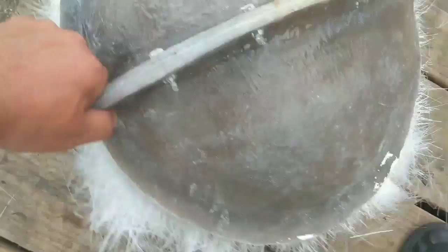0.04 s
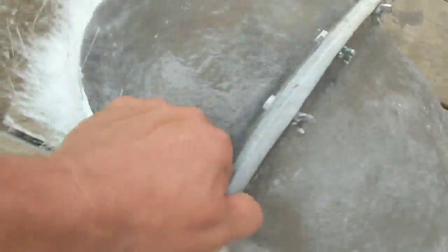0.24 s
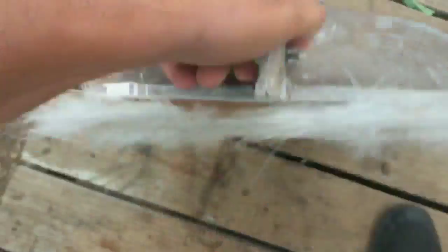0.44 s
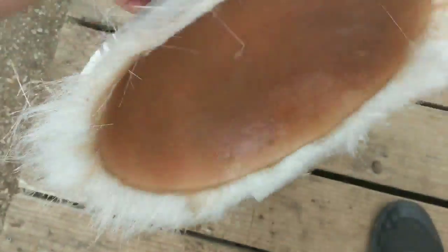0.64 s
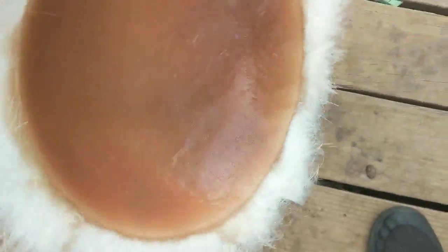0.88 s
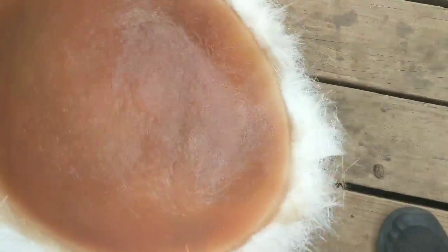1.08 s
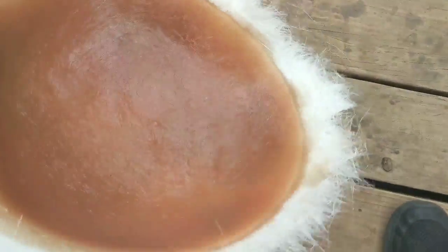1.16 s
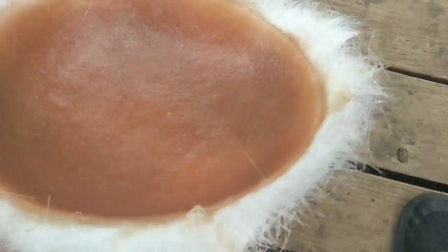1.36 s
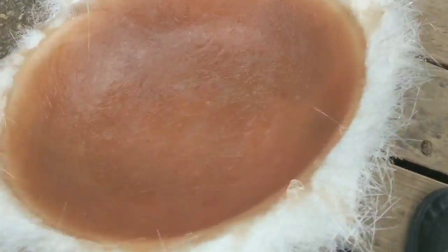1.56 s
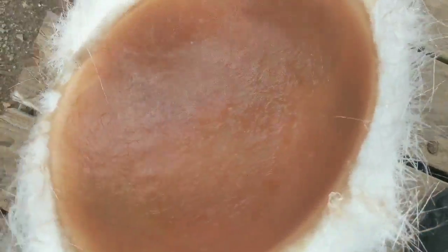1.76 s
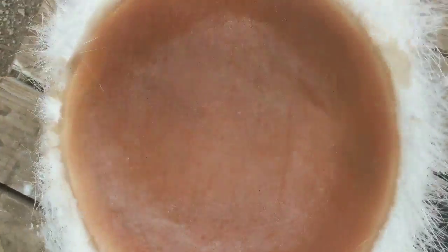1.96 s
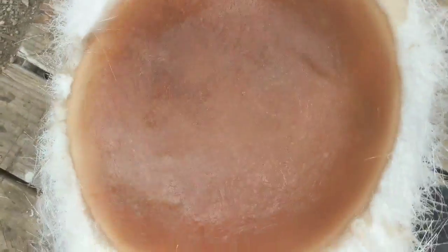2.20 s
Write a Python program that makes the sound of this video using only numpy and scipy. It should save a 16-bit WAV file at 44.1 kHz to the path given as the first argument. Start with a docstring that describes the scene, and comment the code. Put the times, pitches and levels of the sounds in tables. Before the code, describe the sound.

A stiff fibreglass shell bumps and scrapes on a wooden deck, close and dry. Soft thuds and a rough drag quicken to a loud, bright clack at 0.37 s. Two hollow knocks come at 0.67 and 0.73, then dull, quieter bumps over low handling rumble. A crisp snap at 1.46, a bristly scratch at 1.82, then hard short-ringing knocks at 1.95, 2.02 and 2.17.

```python
"""Soft bumps, bristly scraping and hard knocks, interleaved over a low rumble: a stiff fibreglass shell is
dragged, turned over and set down on a wooden deck, close to a small microphone.
Knocks, bumps and dragging slips ring a bank of decaying shell modes. Noise bursts make the rim's ticks,
random grains its scrape; shaped noise gives the handling rumble and the quiet floor."""
import sys
import numpy as np
from scipy import signal
from scipy.fft import rfft, irfft
from scipy.io import wavfile

SR = 44100
rng = np.random.default_rng(int(sys.argv[2]) if len(sys.argv) > 2 else 0)


def transcribe(signal):
    """Save signal, clipped to [-1, 1], as a 16-bit WAV file at the path in sys.argv[1]."""
    frames = np.atleast_2d(signal).T
    limited = np.clip(frames, -1, 1)
    pcm = np.round(limited * 32767).astype(np.int16)
    wavfile.write(sys.argv[1], SR, pcm)


def field_ratio(decibels):
    """Amplitude ratio for a level in dB (20 dB per decade); scalars and array-likes work."""
    return 10 ** (np.asarray(decibels, dtype=float) / 20)


N = 98431

# resonant modes of the shell: pitch_hz [Hz], level_db [dB, relative], t60_s [s, before ring_scale]
SHELL_MODES = [(88, -2, 0.22), (151.7, -13.5, 0.64), (207, 4.5, 0.15), (250, -4, 0.2), (336.1, -4, 0.32),
               (396.3, 2, 0.12), (459, -0.5, 0.13), (538, 0.5, 0.069), (670, -5.5, 0.1), (798, -4.5, 0.069),
               (1125, 0.5, 0.027), (1360, -7.5, 0.048), (1723, -2, 0.021)]


def in_time(rows, outside_db=-120):
    """A level curve (s, dB) as gain, practically silent outside its span."""
    s, db = np.transpose(rows)
    return field_ratio(np.interp(np.arange(N) / SR, s, db, left=outside_db, right=outside_db))


def rms_one(x):
    """Scale to unit rms."""
    return x / np.sqrt(np.mean(x ** 2) + 1e-20)


def colour(x, points):
    """Shape a spectrum by a (Hz, dB) table, then scale to unit rms."""
    hz, db = np.transpose(points)
    f = np.maximum(np.fft.rfftfreq(len(x), 1 / SR), 1)
    gain = field_ratio(np.interp(np.log(f), np.log(hz), db))
    return rms_one(irfft(rfft(x) * gain, len(x)))


def soften(x, hz):
    """A double one-pole low-pass: dulls a sound or slows noise into a wander."""
    r = np.exp(-2 * np.pi * hz / SR)
    return signal.lfilter([(1 - r) ** 2], [1, -2 * r, r * r], x)


def grains(per_s, spread_db):
    """Random clicks of either sign whose sizes spread exponentially in dB."""
    size = field_ratio(spread_db * np.minimum(rng.exponential(1, N), 5))
    sign = rng.choice([-1, 1], N)
    return size * sign * (rng.random(N) < per_s / SR)


def add(out, s, sound):
    """Mix a sound in at a time."""
    i = max(int(s * SR), 0)
    out[i:i + len(sound)] += sound[:N - i]


def quiet_floor():
    """Steady background noise, strongest in the low mids."""
    # floor spectrum: pitch_hz [Hz], density_db [dB per Hz, relative]
    floor_colour = [(120, -15), (200, -4), (321, -13.5), (422, -15), (842, -20), (1050, -23), (1400, -23.5),
                    (2130, -29.5), (6130, -35.5), (8350, -39), (15500, -66)]
    return field_ratio(-44) * colour(rng.standard_normal(N), [(60, -43)] + floor_colour)


def rumble():
    """Lumpy low noise from hands and boards."""
    # handling strength: time_s [s], level_db [dB rms before the lumps]
    handling = [(0, -31.5), (.2, -27), (.45, -33), (.65, -43.5), (.7, -23.5), (.83, -32.5), (1.0, -37.5),
                (1.07, -42), (1.5, -33), (1.78, -35.5), (2.0, -38.5), (2.23, -26.5)]
    # rumble spectrum: pitch_hz [Hz], density_db [dB per Hz, relative]
    low_colour = [(25, -26), (60, 11.5), (90, 11), (130, 8.5), (250, -7), (600, -42.5)]
    lumps_db = 3 * rms_one(soften(rng.standard_normal(N), 33))
    return in_time(handling) * field_ratio(lumps_db) * colour(rng.standard_normal(N), low_colour)


def scrape():
    """Grains from the glass bristles along the rim; coarse and fine bristles clump separately."""
    # one level curve per stroke of the rim: time_s [s], level_db [dB rms]
    strokes = [
        [(0, -30.5), (.016, -49), (.06, -47.5), (.118, -38), (.156, -52.5), (.2, -39), (.29, -47.5),
         (.303, -57), (.36, -41)],
        [(1.1, -54), (1.205, -74), (1.215, -46), (1.3, -53), (1.4, -51.5), (1.415, -36), (1.425, -47.5),
         (1.455, -35.5), (1.484, -46), (1.595, -60.5), (1.605, -40), (1.75, -58.5)],
        [(1.775, -48), (1.795, -43), (1.804, -46.5), (1.812, -28.5), (1.83, -33.5), (1.89, -45.5), (1.94, -46),
         (1.96, -44.5), (2.06, -55), (2.14, -71), (2.172, -29.5)],
    ]
    # brightness of each stroke: tilt_db [dB per octave]
    tilts = [0, 1, -1.2]
    # bristle spectrum: pitch_hz [Hz], density_db [dB per Hz, relative]
    bristle_colour = [(300, -46), (700, 2), (1100, -5), (2000, -4.5), (4000, -6), (8500, -9.5),
                      (12000, -23), (16000, -33)]
    catch_db, catch_hz = 3.5, 45  # bristles catch and let go in clumps: rms swing, low-pass corner
    hz, db = np.transpose(bristle_colour)
    octaves = np.log2(hz / 3000)
    out = np.zeros(N)
    for level, tilt_db in zip(strokes, tilts):
        tilted = np.c_[hz, db + tilt_db * octaves]
        bristles = colour(grains(per_s=5000, spread_db=3.5), tilted)
        coarse = soften(bristles, 6000)
        fine = bristles - coarse
        coarse_clumps, fine_clumps = [field_ratio(catch_db * rms_one(soften(white, catch_hz)))
                                      for white in rng.standard_normal((2, N))]
        out += in_time(level) * rms_one(coarse_clumps * coarse + fine_clumps * fine)
    return out


def ticks():
    """Cracks of hard contact and snapping fibres: short noise bursts around a pitch with a faint tail."""
    # cracks: start_s [s], level_db [dB, 6 above the rms of the onset], pitch_hz [Hz, band centre],
    # t60_s [s, of the crack without its tail]
    cracks = [(0.053, -23.5, 4130, 0.0028), (0.0795, -36, 9100, 0.06), (0.181, -36, 8500, 0.0096),
              (0.194, -39.5, 7700, 0.018), (0.25, -28, 3070, 0.017), (0.2723, -29, 2620, 0.024),
              (0.298, -37, 3100, 0.18), (.336, -33, 2440, 0.023), (0.3674, -18.5, 2870, 0.035),
              (0.673, -16.5, 2140, 0.0086), (0.677, -38, 4050, 0.2), (0.731, -19.5, 2130, 0.0074),
              (1.181, -33.5, 1830, 0.076), (1.2117, -29.5, 4740, 0.019), (1.224, -40.5, 4800, 0.16),
              (1.439, -21, 6500, 0.018), (1.457, -14.5, 2060, 0.018), (1.459, -14, 5670, 0.022),
              (1.6025, -33, 5000, 0.022), (1.616, -40.5, 4770, 0.05), (1.7925, -28, 2670, 0.027),
              (1.818, -11.5, 4400, 0.0099), (1.851, -21.5, 4230, 0.014), (1.9455, -27.5, 1860, 0.026),
              (1.946, -23.5, 5970, 0.02), (1.957, -31.5, 4350, 0.068), (1.972, -22.5, 8200, 0.0068),
              (2.017, -29.5, 3320, 0.037), (2.175, -28, 1700, 0.064)]
    rise_s, tail_db, tail_t60_s = .0005, -25, .16
    spread_oct = .48
    out, t = np.zeros(N), np.arange(8192) / SR
    tail = field_ratio(tail_db - 60 * t / tail_t60_s)
    for (s, db, hz, t60), white in zip(cracks, rng.standard_normal((len(cracks), len(t)))):
        burst = white * (1 - np.exp(-t / rise_s)) * (field_ratio(-60 * t / t60) + tail)
        edges = np.clip(hz * 2 ** (np.array([-.5, .5]) * spread_oct), 100, .45 * SR)
        band = signal.sosfilt(signal.butter(1, edges, "band", fs=SR, output="sos"), burst)
        onset_rms = np.std(band[:60])
        add(out, s, field_ratio(db) * band / onset_rms / 2)
    return out


def shell_ring(hz, slopes_db, ring_scale, chance):
    """The shell's answer to one click: modes near the favoured pitch lead; low ones lag and swell."""
    scatter_db, grip_detune = 2.5, .02  # the changing grip shifts mode levels and pitches
    travel_s = .0015  # travel time of a 200 Hz bending wave; low waves are slower
    rise_cycles = .25  # time constant of each mode's build-up
    modes_hz, db, t60 = np.transpose(SHELL_MODES)[:, :, None]
    octaves = np.log2(modes_hz / hz)
    # slopes: fall per octave below and above the favoured pitch
    db = db - np.abs(octaves) * np.where(octaves < 0, *slopes_db) + scatter_db * chance[0]
    modes_hz = modes_hz * (1 + grip_detune * chance[1])
    lag = travel_s * (np.sqrt(200 / modes_hz) - 1 / 4)  # counted from a 3200 Hz wave
    t = np.maximum(np.arange(SR // 2) / SR - lag, 0)
    swell = 1 - np.exp(-t * modes_hz / rise_cycles)
    decay = field_ratio(db - 60 * t / (t60 * max(ring_scale, .05)))
    return np.sum(swell * decay * np.sin(2 * np.pi * modes_hz * t), axis=0)


def drag():
    """Uneven slips over the boards drive the damped shell."""
    # dragging strength: time_s [s], level_db [dB rms]
    pull = [(.12, -46), (.2, -26.5), (.256, -23), (.31, -25.5), (.36, -24.5)]
    slips = grains(per_s=900, spread_db=4)
    ring = shell_ring(hz=1710, slopes_db=(0, 2), ring_scale=.52, chance=np.zeros(2))
    steady_rms = np.std(signal.fftconvolve(slips, ring))
    return signal.fftconvolve(slips * in_time(pull), ring)[:N] / steady_rms


def blows(rows, slopes_db, chatter_db):
    """Each blow and its small rebounds ring the shell, held a little differently every time."""
    chatter_per_s, chatter_t60_s = 700, .13
    out, t = np.zeros(N), np.arange(4096) / SR
    fading = field_ratio(chatter_db - 60 * t / chatter_t60_s)
    chances = rng.standard_normal((len(rows), 2, len(SHELL_MODES), 1))
    draws = rng.random((len(rows), 2, len(t)))
    for (s, db, hz, ring_scale), chance, (born, size) in zip(rows, chances, draws):
        contact = (born < chatter_per_s / SR) * (2 * size - 1) * fading
        contact[0] = 1  # the blow itself
        ring = signal.fftconvolve(shell_ring(hz, slopes_db, ring_scale, chance), contact)
        add(out, s, field_ratio(db) * ring / np.abs(ring).max())
    # the small shell moves little air in the deep bass
    return signal.sosfilt(signal.butter(2, 70, "high", fs=SR, output="sos"), out)


def bumps():
    """Soft bumps of hand and shell: modes above the favoured pitch fall away steeply."""
    # bumps: start_s [s], level_db [dB peak before the bass cut], pitch_hz [Hz, favoured],
    # ring_scale [multiplier on the modes' ring time: below 1 damped, above 1 longer ringing]
    soft_hits = [(.002, -20, 250, 0.36), (.064, -15.5, 183, 0.2), (.118, -8.5, 273, 0.44),
                 (.204, -15, 307, 0.33), (.228, -14.5, 152, 0.47), (.250, -9, 250, 0.58),
                 (.273, -11.5, 250, 0.69), (.338, -9, 316, 0.9), (.686, -6, 340, 0.77),
                 (.708, -17.5, 129, 0.58), (.765, -13, 109, 0.6), (.896, -13, 179, 0.11),
                 (.943, -27, 88, 0.79), (1.009, -17, 130, 0.15), (1.169, -17.5, 240, 0.18),
                 (1.176, -14.5, 100, 0.19), (1.298, -14.5, 195, 0.11), (1.311, -12.5, 89, 0.1),
                 (1.463, -6.5, 505, 0.43), (1.489, -17.5, 144, 0.18), (1.535, -15.5, 73, 0.39),
                 (1.675, -12.5, 175, 0.11), (1.834, -9.5, 322, 0.58)]
    return blows(soft_hits, slopes_db=(6, 13), chatter_db=-20)


def knocks():
    """Hard knocks on the shell: more of the upper modes and stronger rebounds."""
    # knocks: start_s [s], level_db [dB peak before the bass cut], pitch_hz [Hz, favoured],
    # ring_scale [multiplier on the modes' ring time: below 1 damped, above 1 longer ringing]
    hard_hits = [(.3675, 2.5, 1340, 0.53), (.3705, -11, 1440, 1.2), (.374, -8.5, 293, 1.18),
                 (.672, -1.5, 566, 0.63), (.732, -0.5, 670, 0.34), (1.457, -8.5, 1500, 0.13),
                 (1.9455, 3.5, 256, 0.32), (2.0135, -6, 397, 0.43), (2.021, -10, 318, 0.62),
                 (2.044, -22.5, 840, 0.68), (2.1745, 1.5, 430, 0.44), (2.198, -13.5, 285, 0.51)]
    return blows(hard_hits, slopes_db=(7, 4.5), chatter_db=-17)


def room(x):
    """A short, dull wash of reflections: decaying soft noise of unit energy as an echo pattern."""
    level_db, t60_s, cut_hz, gap_s = -23.5, .2, 1020, .004
    t = np.arange(SR // 2) / SR
    tail = soften(rng.standard_normal(len(t)), cut_hz) * field_ratio(-60 * t / t60_s) * (t > gap_s)
    return field_ratio(level_db) * signal.fftconvolve(x, tail / np.sqrt(np.sum(tail ** 2)))[:N]


def scene():
    """Shell sounds with their reflections, over rumble and floor."""
    shell = scrape() + ticks() + drag() + bumps() + knocks()
    return (quiet_floor() + rumble() + room(shell) + shell)[None]


def low_pass(x):
    """Removes everything above the highest recorded frequency."""
    return signal.sosfilt(signal.butter(12, 16450, fs=SR, output="sos"), x)


def record(dry):
    """The microphone drops the deep bass and the very top; peaks beyond full scale clip."""
    x = signal.sosfilt(signal.butter(4, 50, "high", fs=SR, output="sos"), dry)
    x = signal.sosfilt(signal.butter(8, 15000, fs=SR, output="sos"), x)
    return low_pass(np.clip(x, -1, 1))


dry = scene()
out = record(dry)
transcribe(out)
```